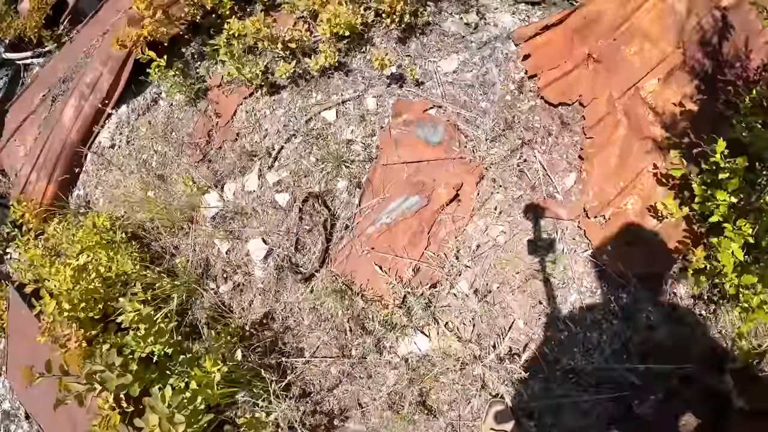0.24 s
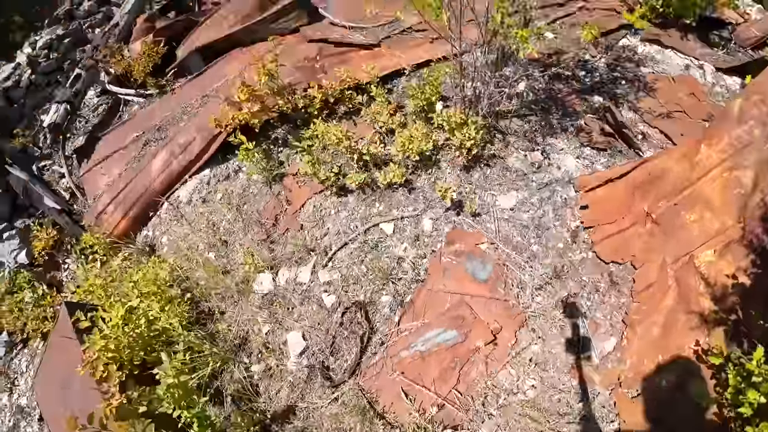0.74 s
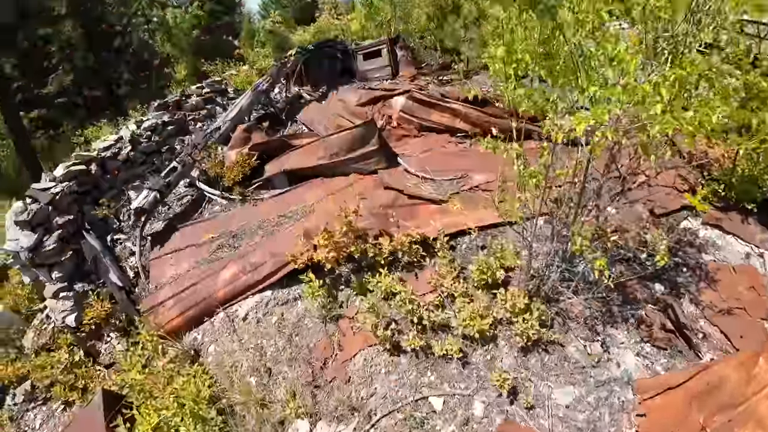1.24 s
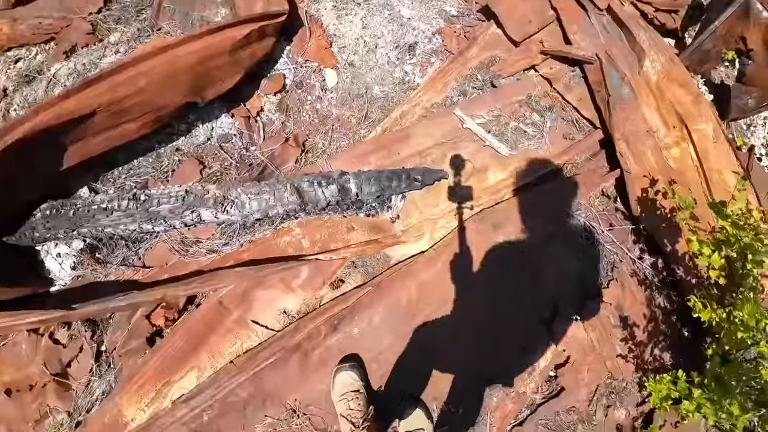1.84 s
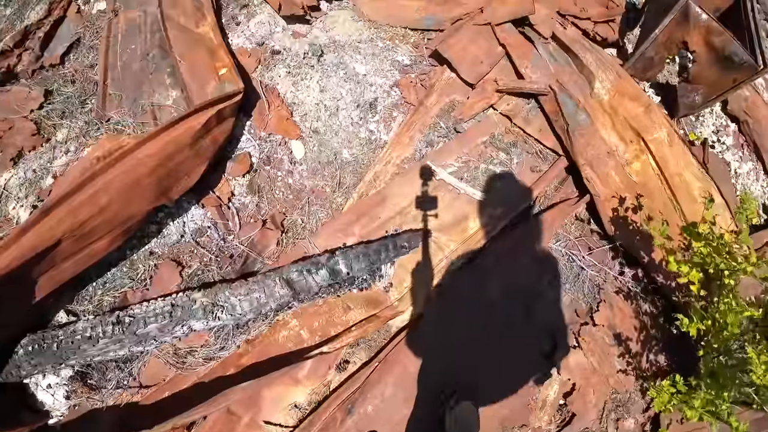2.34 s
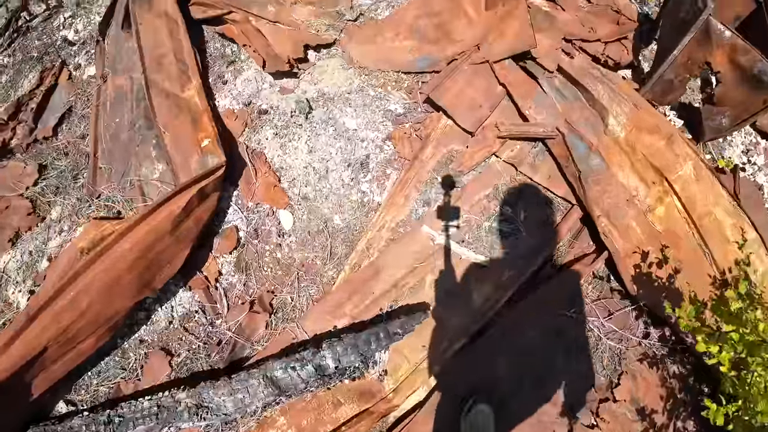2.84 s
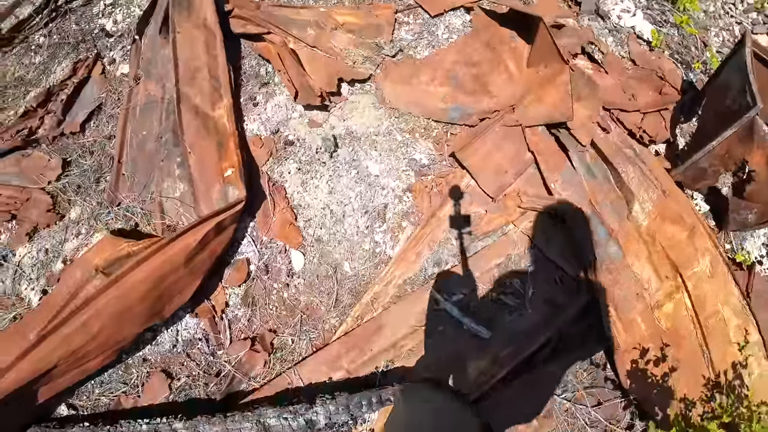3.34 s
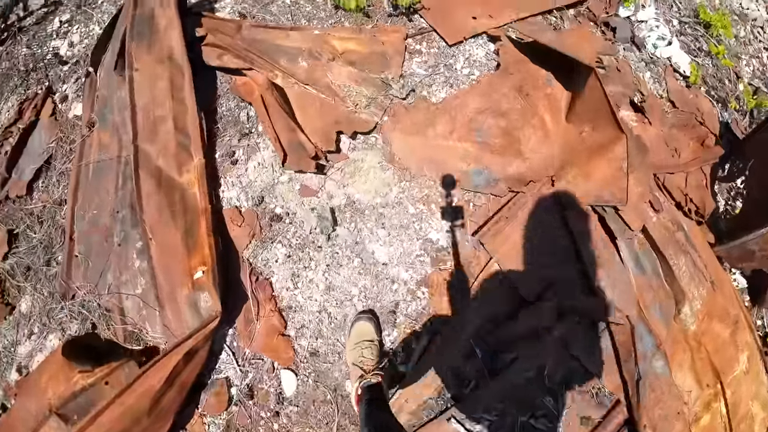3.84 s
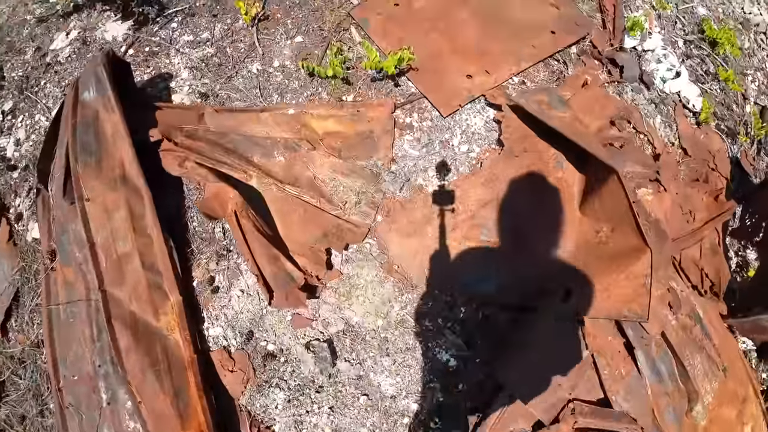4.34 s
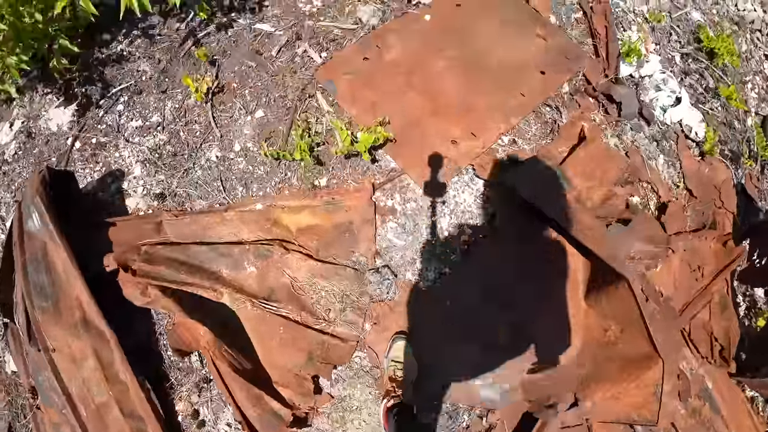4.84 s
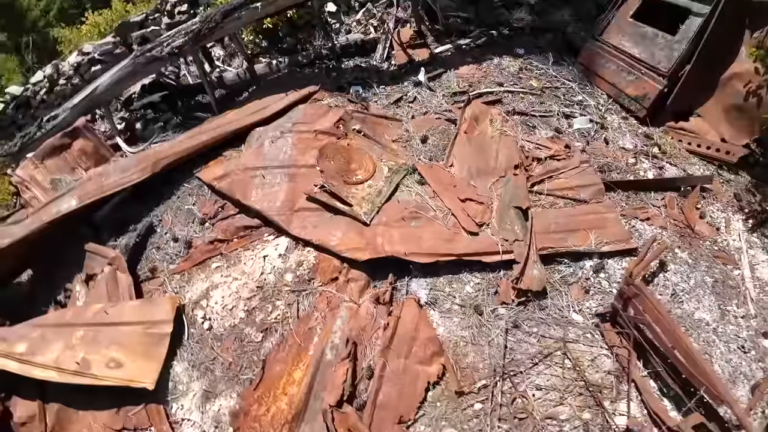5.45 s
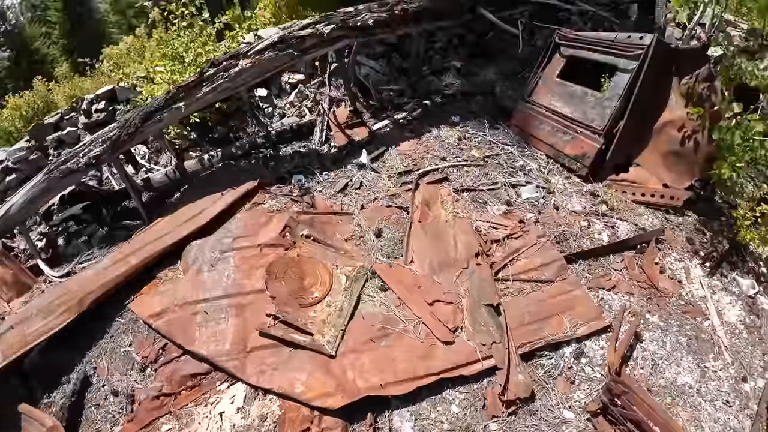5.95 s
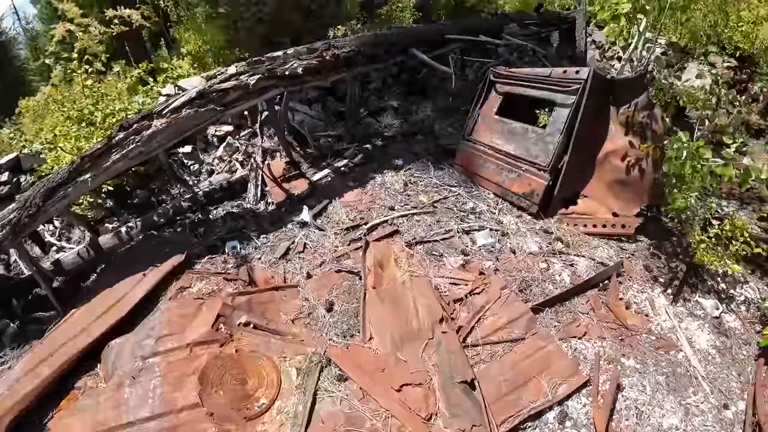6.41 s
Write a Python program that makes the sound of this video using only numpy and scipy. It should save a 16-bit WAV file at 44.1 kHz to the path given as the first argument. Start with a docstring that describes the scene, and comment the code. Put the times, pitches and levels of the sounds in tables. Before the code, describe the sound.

Irregular footsteps crush brittle burnt debris close to a small stereo microphone in the open air. Soft scuffs and small cracks give way to one loud crunch with a dull metal thud, then busy grinding, snapping and clinking. After a lull, more steps crunch and a final group cracks over a flexing metal sheet. Wind puffs softly buffet; the hand faintly rubs the grip.

```python
"""Boots crush ash, charcoal and rust flakes as someone walks, camera in hand, through a burned building outdoors.
The crunch is a dense sum of tiny ringing fractures and noise, its level following the load on the boot.
Brittle pieces snap and clink as damped resonances; flat roofing sheets knock and ring underfoot in their modes.
Light wind buffets two microphone ports as low-frequency noise, and the hand rubs the camera grip.
Filtered noise stands for distant trees."""
import sys
import numpy as np
from scipy import signal
from scipy.fft import rfft, irfft, next_fast_len
from scipy.io import wavfile
from scipy.ndimage import uniform_filter1d

SR = 44100
rng = np.random.default_rng(int(sys.argv[2]) if len(sys.argv) > 2 else 0)


def log_audio(samples):
    """Write samples as a 16-bit WAV file to the path given in sys.argv[1]."""
    # one column per channel
    frames = np.atleast_2d(samples).T
    # limit to full scale, then quantise
    limited = np.clip(frames, -1, 1)
    pcm = np.round(limited * 32767).astype(np.int16)
    wavfile.write(sys.argv[1], SR, pcm)


N = 294538
TIME = np.arange(N) / SR


def amp(db):
    """Amplitude ratio: 20 dB is a factor of ten."""
    return 10 ** (np.asarray(db) / 20)


def unit(x):
    """Normalization to a root-mean-square of 1."""
    return x / np.sqrt(np.mean(x ** 2) + 1e-20)


def read(points, hz):
    """Interpolation of a spectrum on a logarithmic frequency axis."""
    f, value = np.transpose(points)
    return np.interp(np.log(hz + 1), np.log(f), value)


def colour(x, points):
    """Linear filtering: multiplies the spectrum by a gain curve of (frequency_hz, gain_db)."""
    size = next_fast_len(x.shape[-1] + 2048)  # padded against wrap-around
    gain = amp(read(points, np.fft.rfftfreq(size, 1 / SR)))
    return irfft(rfft(x, size) * gain, size)[..., :x.shape[-1]]


def band(x, edges_hz, kind, order=3):
    """Butterworth filtering: a maximally flat passband."""
    return signal.sosfilt(signal.butter(order, edges_hz, kind, fs=SR, output="sos"), x)


def ring(x, hz, q):
    """Damped resonance: the response of one oscillator of sharpness q."""
    size = next_fast_len(2 * x.shape[-1])
    f = np.fft.rfftfreq(size, 1 / SR) + 1
    response = 1 / (1 + 1j * q * (f / hz - hz / f))
    return irfft(rfft(x, size) * response, size)[..., :x.shape[-1]]


def wander(per_s):
    """Slow random fluctuation: noise averaged twice over 1 / per_s seconds, at rms 1."""
    size = int(SR / per_s)
    smooth = uniform_filter1d(rng.standard_normal(N), size)
    return unit(uniform_filter1d(smooth, size))


def add(mix, s, sound):
    """Superposition: sums a two-row sound into the mix at time s."""
    part = mix[:, max(round(s * SR), 0):][:, :sound.shape[1]]
    part += sound[:, :part.shape[1]]


def grains(per_s=6500, spread_db=3.0, cycles=1.494, count=36):
    """Fracture noise: countless tiny breaks ring for a few cycles; small, high fragments are more common."""
    out, t = np.zeros((2, N)), np.arange(SR // 70) / SR
    pitches = np.geomspace(450, 14000, count)
    shares = pitches ** .5 / np.sum(pitches ** .5)
    for hz, share in zip(pitches, shares):
        at = rng.integers(0, N, int(per_s * share * N / SR))
        strengths = amp(spread_db * np.minimum(rng.exponential(1, len(at)), 3.5))
        clicks = np.zeros((2, N))
        clicks[:, at] = strengths * rng.choice([-1, 1], (2, len(at)))
        onset = 1 - np.exp(-2 * hz * t)
        fragment = np.sin(2 * np.pi * hz * t) * np.exp(-hz * t / cycles) * onset
        out += np.sqrt(hz) * unit(signal.oaconvolve(clicks, fragment[None], axes=1)[:, :N])
    return unit(out)


def patchy(x, patch_db=2.5, frames=16, bins=4):
    """Uneven ground response: broad random peaks and dips in the spectrum drift with time."""
    z = signal.stft(x, nperseg=512)[2]
    spots = uniform_filter1d(rng.standard_normal(z.shape[1:]), frames, axis=1)
    spots = uniform_filter1d(spots, bins, axis=0)
    return signal.istft(z * amp(patch_db * unit(spots)), nperseg=512)[1][:, :N]


def collapses(per_s=95, size_db=0.5, settle_s=0.00202):
    """Shot noise: clumps cave in at random, so the grit flares up and decays within milliseconds."""
    kicks = (rng.random(N) < per_s / SR) * np.minimum(rng.exponential(1, N), 3.2)
    flares = signal.lfilter([1], [1, -np.exp(-1 / (settle_s * SR))], kicks)
    return 1 + amp(size_db) * flares


def crumbs(per_s=65, spread_db=2.6, ring_hz=2900, octaves=1.1, q=2.2, crack_s=0.0004, count=14):
    """Sparse impulsive excitation: larger crumbs crack one by one, each at one of several resonances."""
    out, t = np.zeros((2, N)), np.arange(SR // 100) / SR
    for hz in ring_hz * 2 ** (octaves * np.linspace(-1, 1, count)):
        at = rng.integers(0, N, int(per_s * N / SR / count))
        clicks = np.zeros(N)
        clicks[at] = amp(spread_db * np.minimum(rng.exponential(1, len(at)), 2))
        crack = ring(rng.standard_normal((2, len(t))) * np.exp(-t / crack_s), hz, q)
        out += unit(signal.oaconvolve(clicks[None], crack, axes=1)[:, :N])
    return unit(out)


def pressure(start, loading_s, hold_s, fade_s):
    """Load envelope: the weight comes on linearly, rests, then the debris settles exponentially."""
    t = TIME - start
    loading = np.clip(t / max(loading_s, .002), 0, 1)
    return loading * amp(-20 * np.maximum(t - loading_s - hold_s, 0) / fade_s)


def crunch(powder_db=-1.5, crumbs_db=-9, crunch_db=0, body_db=0, weight_db=0.0):
    """Granular crushing: grains and hissing ash give way in clumps, in three bands powered by the boot's load."""
    # spectrum of the grit: frequency_hz, gain_db
    grit_colour = [(100, 4), (180, 6.5), (350, -2.5), (700, -4), (1200, -5), (2600, -1.5), (6000, -8.5),
                   (10000, -13.5), (16000, -8)]
    # dry stalks brighten the first steps, fully from 7.5 kHz up: time_s, boost_db
    stalks = [(.1, 12), (1.8, 0.8)]
    # a boot bears down, rolls or scuffs: start_s, loading_s, hold_s, fade_20db_s,
    # crunch_db (over 1.5 kHz), body_db (0.5-1.5 kHz), weight_db (on the sheets, 95-450 Hz)
    presses = [(0, 0.0037, 0.143, 0.4049, -59, -62.5, -64.5),
               (0.199, 0.0217, .11, .22, -53.5, -54.5, -61.5),
               (0.563, 0.032, 0.33, 0.03, -68.5, -65.5, -66), (.865, 0.07, 0.032, .26, -54, -56, -56.5),
               (1.596, 0.0164, 0.244, 2.14, -62, -63.5, -66), (1.8, .02, 0.0275, 0.5941, -44, -50.5, -56),
               (1.852, 0.007, 0.0146, 0.135, -33, -29.5, -38.5),
               (1.93, 0.0046, 0.012, 0.04, -39.5, -45.5, -45), (2.002, 0.02, 0.022, 0.2, -41.5, -45, -52.5),
               (2.098, 0.0145, 0.0062, 0.2648, -62, -48.5, -45.5), (2.315, .006, .01, .17, -53, -60, -70),
               (2.517, .026, .035, .3, -42.5, -46, -44), (2.661, 0.0462, 0.0071, 0.15, -43, -41, -48),
               (2.83, 0.028, 0.059, 0.5, -45.5, -45.5, -44.5),
               (3.109, 0.0128, 0.0095, 0.1077, -39.5, -45.5, -45),
               (3.205, 0.025, 0.03, 0.16, -35.5, -44, -48), (3.334, 0.009, 0.007, 0.16, -39.5, -45, -45.5),
               (3.428, 0.0127, 0.0723, 0.2975, -48.5, -52.5, -52),
               (3.755, 0.02, 0.03, 0.65, -50, -48.5, -49.5), (4.136, 0.022, 0.462, 0.42, -62, -65, -66),
               (4.645, 0.029, 0.125, 0.14, -57, -58.5, -61), (4.771, 0.0276, 0.0834, 0.2542, -49, -58, -55),
               (5.032, 0.032, 0.0071, 0.18, -45.5, -50.5, -54.5),
               (5.15, 0.015, 0.035, 0.24, -42, -48.5, -49.5),
               (5.474, 0.0506, 0.029, 0.1212, -50.5, -51, -50.5),
               (6.231, 0.011, 0.1976, 0.08, -42, -44.5, -52.5), (6.398, 0.043, 0.21, .2, -42, -44.5, -52.5),
               (6.47, 0.147, .08, .2, -55, -41.5, -40.5)]
    # disturbed debris between steps: crunch_db, body_db, weight_db
    settling_db = (-73, -73.5, -70.5)

    ash = amp(powder_db) * rng.standard_normal((2, N))
    grit = unit(colour(patchy(grains() + ash) * collapses(), grit_colour))
    grit = grit + amp(crumbs_db) * crumbs()
    fine = band(grit, 1500, "high")
    body = band(grit, [500, 1500], "band")
    weight = band(grit, [95, 450], "band")
    fizz = colour(fine, [(4000, -30), (7500, 0)])
    fine = fine + fizz * (amp(np.interp(TIME, *np.transpose(stalks))) - 1)

    loads = np.array([pressure(*row[:4]) for row in presses])
    press_powers = amp([row[4:] for row in presses]).T ** 2 @ loads ** 2
    powers = press_powers + amp(settling_db)[:, None] ** 2
    layers = zip((fine, body, weight), powers, (crunch_db, body_db, weight_db))
    return sum(unit(part) * np.sqrt(power) * amp(trim) for part, power, trim in layers)


def breeze():
    """Addition of powers: each puff swells, holds and dies over a steady flow; gives the relative level in dB."""
    # puffs of air on the microphone: peak_s, half_width_s, relative_level_db
    puff_rows = [(1.02, 0.1174, -41), (2.76, 0.171, -38.5), (3.87, 0.114, -41.5), (5.4, .3, -35.2),
                 (6.62, 0.165, -40)]
    steady_db = -47.5  # relative level between the puffs
    puffs = sum(amp(db) ** 2 / (1 + ((TIME - s) / width) ** 8) for s, width, db in puff_rows)
    return 10 * np.log10(amp(steady_db) ** 2 + puffs)


def wind(level_db=2.0, eddy_db=2, gust_db=-39, buffet_db=-2):
    """Turbulent pressure: eddies press on the ports together and apart; strong gusts reach higher in pitch."""
    # spectrum of the rumble: frequency_hz, gain_db
    breeze_colour = [(25, 1.5), (35, -7.5), (65, -12), (100, -22.5), (200, -36), (800, -62)]
    # eddies that push the ports apart: frequency_hz, gain_over_common_push_db
    opposed_colour = [(13, 14), (25, 7.5), (55, -1), (120, -2)]

    level = breeze()
    rumble = unit(colour(rng.standard_normal((2, N)), breeze_colour))  # rows: common, opposed
    buffet = unit(band(rng.standard_normal((2, N)), [33, 82], "band", order=2))
    buffet = buffet * amp(eddy_db * wander(18.6))
    strength = np.clip(amp(level - gust_db) - 1, 0, 1)  # 0 until the level passes gust_db
    rumble[1] = colour(rumble[1], opposed_colour) / (1 + 2 * strength)
    push = rumble / (1 + strength / 2) + amp(buffet_db) * strength * buffet
    return band(amp(level + level_db) * push, 6.84, "high", order=1)


def trees(air_db=-72, air_side_db=-9):
    """Diffuse background: steady coloured noise from distant trees, weaker in the side signal."""
    # spectrum of the trees: frequency_hz, gain_db
    air_colour = [(900, 7), (2000, -9), (5000, -17), (16000, -61)]
    noise = unit(colour(rng.standard_normal((2, N)), air_colour))
    return amp(air_db) * noise * amp([[0], [air_side_db]])


def knocks(q=1.8, sheet_db=-3):
    """Damped impact: a low push joins a sheet's crowded modes (resonant noise), damped by the ground."""
    # dull knocks of soles and loose sheets: start_s, relative_level_db, ring_hz, envelope_t60_s
    strikes = [(0.077, -33, 164, 0.0594), (0.732, -33, 190, 0.0414), (0.972, -24.5, 218.3, 0.0464),
               (1.857, -16, 174.6, 0.122), (1.86, -12, 88, .16), (1.868, -23.5, 400, 0.058),
               (1.953, -26, 650, .015), (1.979, -22, 900, 0.02), (2.138, -25, 887, 0.0344),
               (2.214, -28.5, 900, 0.0464), (2.676, -20, 113.4, 0.1185), (2.865, -19, 688, 0.038),
               (3.207, -29, 139, 0.086), (3.793, -27.5, 105.4, 0.12), (4.795, -35, 181, 0.128),
               (5.454, -19.5, 104.6, 0.076), (5.499, -28, 560, 0.11), (5.631, -32, 351, 0.0287),
               (5.699, -30.5, 72.8, 0.3)]
    out, t = np.zeros((2, N)), np.arange(SR // 4) / SR
    for s, db, hz, t60 in strikes:
        sheet = unit(ring(ring(rng.standard_normal((2, len(t))), hz, q), hz, q / 2))
        sheet = amp(sheet_db) * sheet * (1 - np.exp(-2 * hz * t))
        push = np.sin(2 * np.pi * hz * t) * np.exp(-hz * t / 2)
        add(out, s, amp(db) * (push + sheet) / 2 * amp(-60 * t / t60))
    return out


def snaps(crack_s=0.001165, splinter_db=-5, rattle_s=0.013, rattle_db=-1, lumpy_db=3, level_db=0):
    """Brittle fracture: a sharp break with splinters, then a debris rattle, excite the piece's resonance."""
    # brittle pieces that snap: start_s, crack_level_db (energy spread over 1 ms), ring_hz, ring_q,
    # rattle_over_crack_db (before the common trim rattle_db)
    breaks = [(0.0943, -37.5, 3400, 0.063, 10.5), (0.1861, -39.5, 600, 0.15, -15),
              (0.4607, -39, 3380, 0.042, -14), (0.5522, -33.5, 636, 0.234, -5.5),
              (0.6534, -38.5, 1054, 3.14, -22.5), (0.7654, -32.5, 7360, 0.55, -14.5),
              (0.9235, -34, 4000, 0.2, -4), (1.0497, -38, 1060, 2.44, -12), (1.258, -46, 870, 3.9, -1.5),
              (1.6131, -43.5, 1435, 0.48, 3.5), (1.6598, -43.5, 2380, 0.105, 1),
              (1.8565, -19.5, 560, 1.8, 2), (1.892, -27, 1800, .4, -3), (2.036, -31.5, 1100, 0.88, -4.5),
              (2.2319, -41.5, 706, 0.31, 0), (2.2645, -28, 1583, 0.42, -4),
              (2.3797, -25.5, 2700, 0.41, -2.5), (2.715, -31, 1120, 1.5, 3), (2.8443, -31, 600, 0.84, 0),
              (2.8579, -29.5, 1276, 2.75, 3), (2.894, -27, 1590, 0.69, 2), (2.9243, -21, 1700, 7.6, -11.5),
              (2.9785, -29, 850, 6, -21), (3.0229, -18, 1300, 1.7, -1), (3.0724, -32, 600, 0.195, 4),
              (3.308, -33.5, 2830, .8, -8), (3.3488, -30.5, 2000, 0.39, 4.5), (3.601, -39, 830, .8, -5),
              (3.648, -42.5, 844, 0.93, 7.5), (3.695, -27.5, 2340, 0.357, 1), (3.775, -35, 1020, 1.5, -1),
              (3.8325, -26, 3000, 0.3, -6), (3.855, -34, 900, 1.8, -9), (3.9075, -31, 1100, 1.8, -13),
              (3.9325, -34, 950, 1.29, -2.5), (4.1085, -40, 1800, .4, -4), (4.1673, -38.5, 670, 0.7, -14),
              (4.2595, -43, 1110, 2.2, -9), (4.303, -45.5, 3000, 0.28, 1), (4.7942, -34.5, 960, 0.93, -4.5),
              (5.0775, -34, 600, 0.26, 6), (5.117, -28.5, 1340, 1.64, -10.5), (5.146, -35, 1580, .4, 3),
              (5.182, -33, 3140, .9, 1), (5.2186, -34, 2500, 0.58, 0), (5.2604, -27, 1196, 0.86, 4),
              (5.3303, -34, 2120, 0.36, 4), (5.4104, -37, 1880, 0.72, 9.5), (5.5428, -28, 2140, 0.62, 0.5),
              (5.7046, -45, 746, 1.17, 4.5), (5.825, -55.5, 1600, 0.4, -19.5),
              (5.968, -52, 2500, 0.44, -0.5), (6.0247, -39, 9440, 0.144, 0),
              (6.2401, -31.5, 1490, 0.475, 3.5), (6.2836, -29, 3360, 0.113, 5),
              (6.3307, -33, 1010, 0.65, -1), (6.4158, -26.5, 750, 0.203, -4), (6.4744, -31, 1200, 0.6, -4),
              (6.486, -22, 855, 0.37, 3), (6.5578, -22, 1270, 0.228, 0), (6.622, -29, 1130, .5, -2)]
    out, t = np.zeros((2, N)), np.arange(SR // 12) / SR
    for s, db, hz, q, after_db in breaks:
        splinters, rattle, lumps = rng.standard_normal((3, 2, len(t)))
        crack = amp(splinter_db) * splinters * np.exp(-t / crack_s)
        crack[0, 0] += 1  # the break itself, in the mid signal
        lumpiness = amp(lumpy_db * unit(uniform_filter1d(lumps[0], size=60)))
        rattle = rattle * np.exp(-t / rattle_s) * (1 - np.exp(-t / crack_s)) * lumpiness
        crack, rattle = ring(crack, hz, q), ring(rattle, hz, q)
        crack = crack / np.linalg.norm(crack, axis=1, keepdims=True)  # unit energy
        rattle = rattle / np.linalg.norm(rattle, axis=1, keepdims=True)
        snap = crack + amp(after_db + rattle_db) * rattle
        add(out, s, amp(db + level_db) * np.sqrt(SR / 1000) * snap)
    return out


def grips(decay_s=.011, low_hz=150, high_hz=1000):
    """Structure-borne friction: short dull rubs cross the housing and reach each port differently."""
    # the hand shifts on the camera grip: start_s, level_db
    rubs = [(.553, -54), (.733, -54), (1.611, -50), (5.63, -49), (5.722, -52)]
    out, t = np.zeros((2, N)), np.arange(SR // 12) / SR
    for s, db in rubs:
        rub = unit(band(rng.standard_normal((2, len(t))), [low_hz, high_hz], "band", order=2))
        add(out, s, amp(db) * rub * np.exp(-t / decay_s))
    return out


def clinks(t60=0.0187, apart=0.0602):
    """Free vibration: a thin flake rings briefly on a pair of modes a fraction apart either side of its pitch."""
    # small brittle flakes that clink as they break: start_s, peak_db, centre_hz
    flakes = [(0.7642, -33.5, 6170), (2.3792, -24.5, 1730), (2.8945, -21, 4040), (3.0233, -16, 2630),
              (3.645, -30.5, 2147), (3.6936, -29.5, 6050), (6.2836, -22, 6720), (6.4862, -23, 5145)]
    out, t = np.zeros((2, N)), np.arange(SR // 20) / SR
    for s, db, hz in flakes:
        pair = sum(np.sin(2 * np.pi * (hz * (1 + d) * t + rng.random((2, 1)))) for d in (-apart, apart))
        add(out, s, pair / 2 * amp(db - 60 * t / t60))
    return out


def flexes(width_hz=34):
    """Modal excitation: grit under the sole drives all the sheet's modes at a stamp, the low ones when slow."""
    # modes of a rusted roofing sheet: mode_hz, gain_db
    modes = [(214, -1), (329, 0), (544, -1), (712, 2), (2892, -8), (3436, -7)]
    # a boot bends the sheet and makes it ring:
    # start_s, loading_s, hold_s, fade_20db_s, level_db, brightness_db_per_octave
    bends = [(1.857, .004, .01, .22, -48.5, .8), (6.61, .03, .05, .15, -35, -6)]
    out = np.zeros(N)
    for hz, db in modes:
        q = hz / width_hz
        mode = unit(ring(ring(rng.standard_normal(N), hz, q), hz, q / 2))
        octaves = np.log2(hz / modes[0][0])
        out += mode * sum(pressure(*row) * amp(db + level + tilt * octaves) for *row, level, tilt in bends)
    return out


def scene():
    """Mid-side superposition: close sources differ between ports mainly in the treble; trees are all around."""
    # width of the close sources: frequency_hz, side_gain_db
    width = [(130, -26), (400, -19), (1300, -35), (4500, -16.5), (8000, -10), (13000, -0.5)]
    # balance of the ports: frequency_hz, left_minus_right_db
    balance = [(2400, 0.9), (4800, 2.6), (9000, 0.5)]
    wind_lean_db = -1.5  # the eddies press less on the left port, more on the right

    mid, side = crunch() + snaps() + knocks() + clinks()
    close = np.array([mid + flexes(), colour(side, width)])
    mid, side = close + trees() + grips()
    left = colour(mid + side, [(hz, db / 2) for hz, db in balance])
    right = colour(mid - side, [(hz, -db / 2) for hz, db in balance])
    common, opposed = wind()
    left = left + common + opposed * amp(wind_lean_db)
    right = right + common - opposed * amp(-wind_lean_db)
    return np.array([left, right])


def record(dry):
    """Transducer response: the microphone's colour, then a linear-phase low-pass at the band limit."""
    # microphone response: frequency_hz, gain_db
    microphone = [(4400, 0), (5500, 2), (7200, -0.5), (8600, -2.5), (9900, 3), (11000, 1.5), (12500, -17.5),
                  (15500, -19.5)]
    edge_hz = 16300
    low_pass = signal.firwin(255, edge_hz, window=("kaiser", 9), fs=SR)
    return signal.oaconvolve(colour(dry, microphone), low_pass[None], "same")


dry = scene()
out = record(dry)
log_audio(out)
```